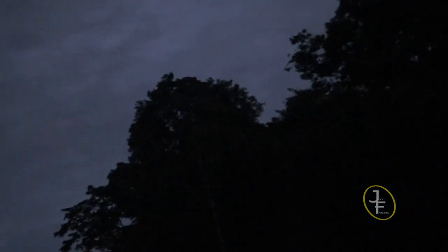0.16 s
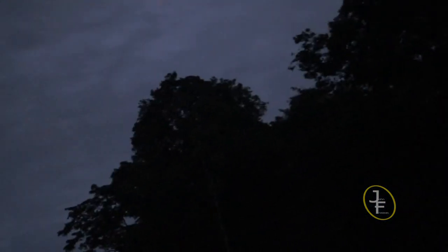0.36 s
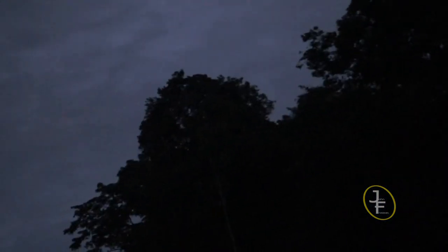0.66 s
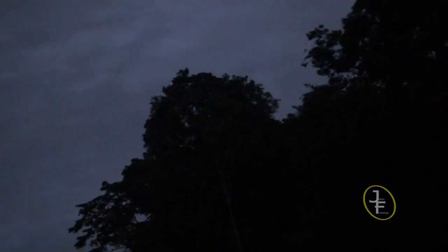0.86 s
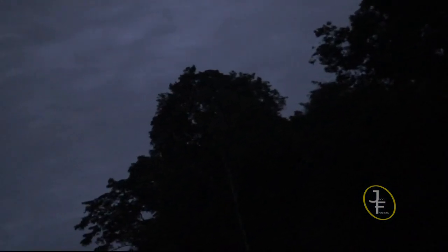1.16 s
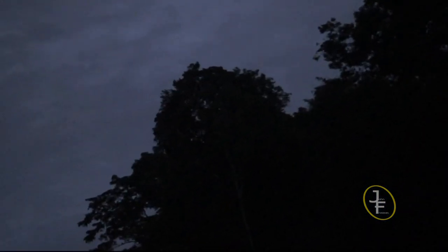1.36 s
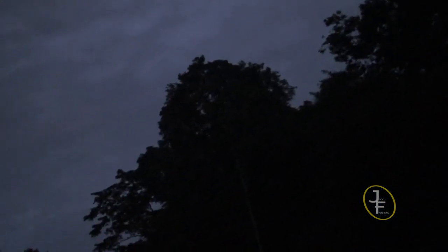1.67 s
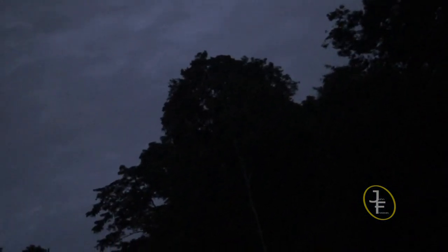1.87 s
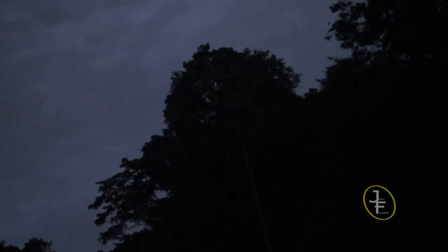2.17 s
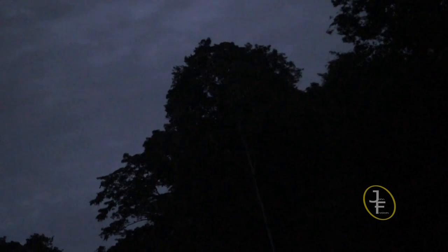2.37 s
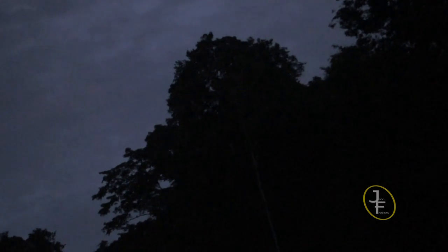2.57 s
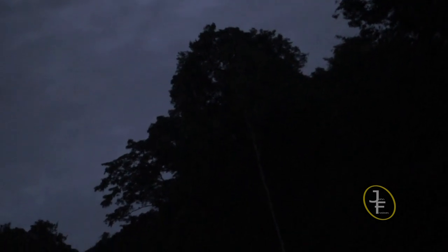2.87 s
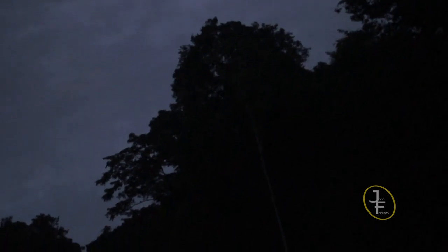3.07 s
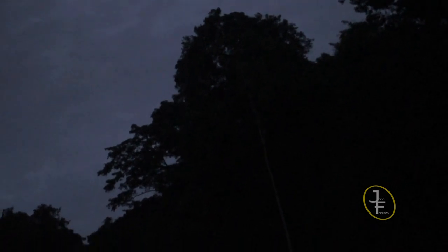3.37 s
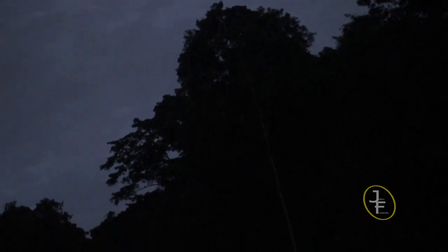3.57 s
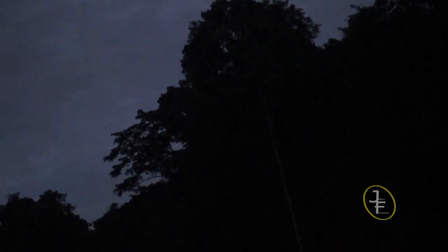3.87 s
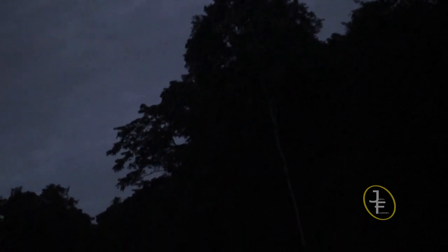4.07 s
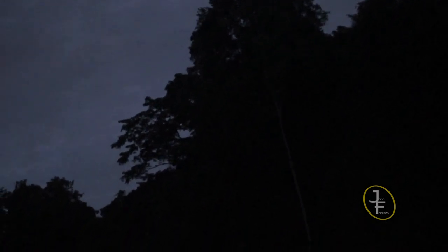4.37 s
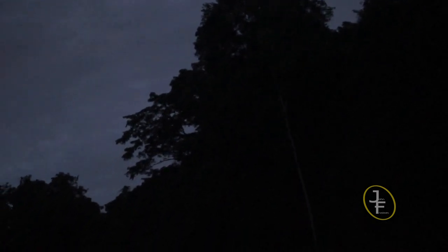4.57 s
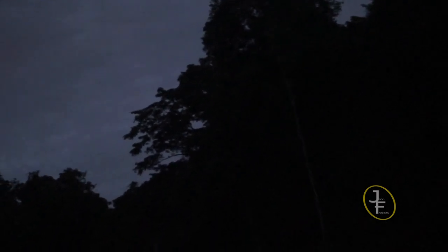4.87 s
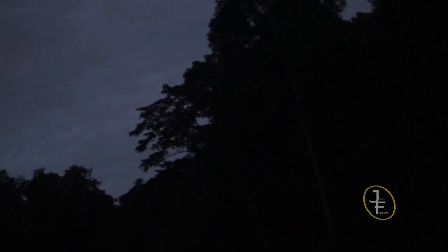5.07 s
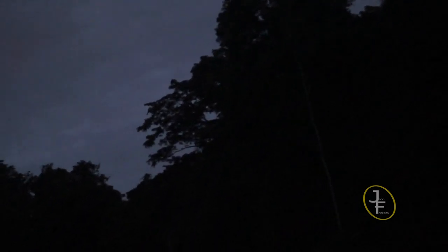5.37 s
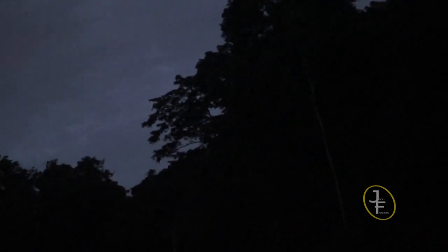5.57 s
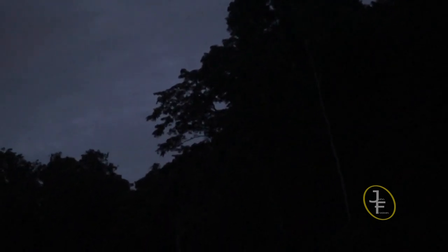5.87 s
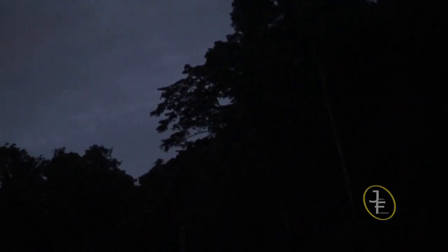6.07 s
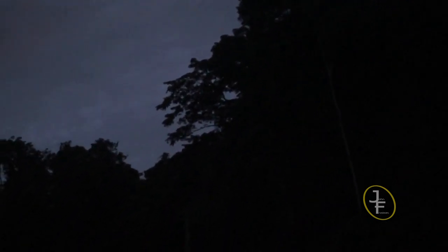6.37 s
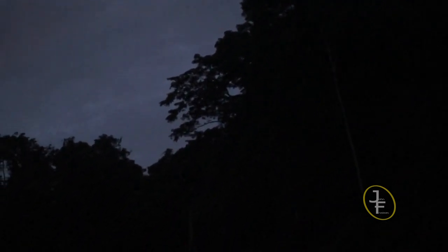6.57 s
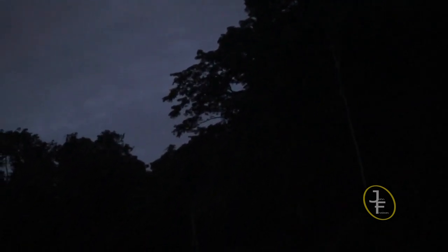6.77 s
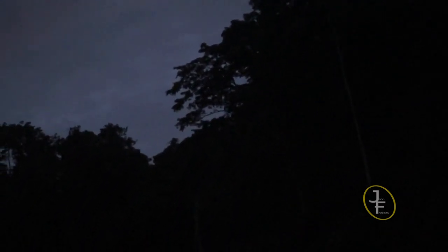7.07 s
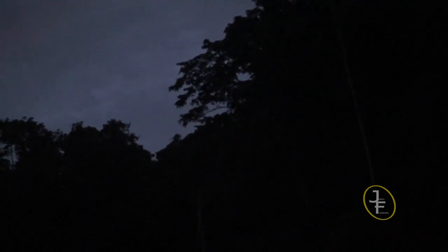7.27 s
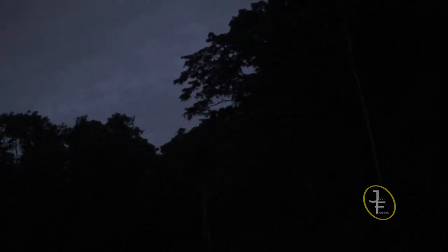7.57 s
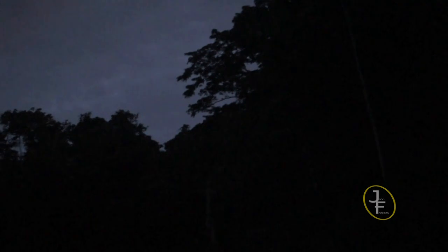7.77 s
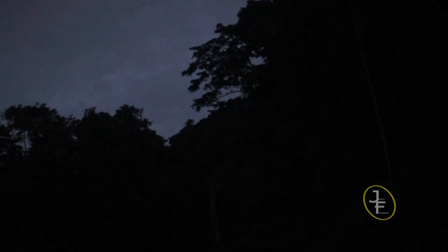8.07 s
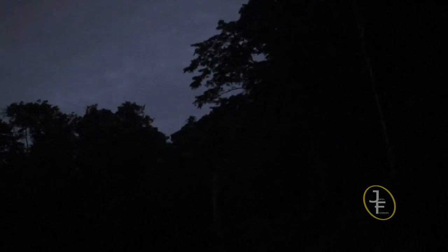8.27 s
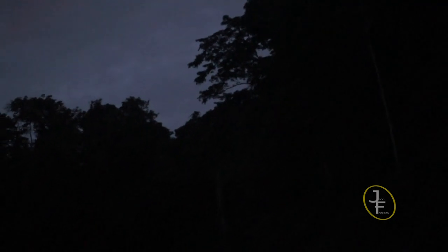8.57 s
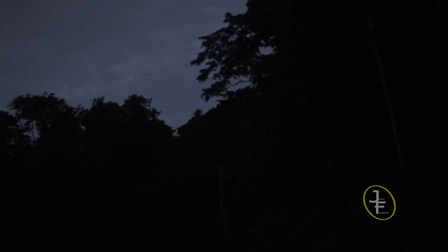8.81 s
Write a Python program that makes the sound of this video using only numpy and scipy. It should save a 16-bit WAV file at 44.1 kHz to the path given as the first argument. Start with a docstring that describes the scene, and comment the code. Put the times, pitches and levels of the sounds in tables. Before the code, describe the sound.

Dusk in a rainforest, wide stereo. From 0 to about 1.6 s a distant howler monkey ends a hoarse, throaty roar, rough and breathy with a wavering tone, fading into soft tree echoes over a low drone and a steady high insect shimmer. Between 1.3 and 2.6 s a katydid gives four coarse rasps; frogs peep and cluck. Low, woofing barks come at 2.3 and 3.4 s, with dark lingering echoes; rising clucks cluster around 3 s. From 3.4 s two near insects enter on the right, one chirping unevenly, a higher one about four times a second, with cricket trills and ticking behind. A faint leaf rustle passes near 4 s. Drops ring leaves at 3.4-3.7 and 5-5.5 s. Soft bumps fall near 5.8 s and the drone vanishes by 6.2 s. Whistled peeps cluster around 6 s; from 6.3 s drips patter densely, thinning towards 9 s as insects continue.

```python
"""A rainforest at dusk, heard in stereo: a distant howler monkey ends a long, hoarse roar and barks twice.
Uneven pulses of its vocal folds ring throat and chest, and the trees echo the calls.
Crickets and katydids scrape their wings all round as pulsed bands of noise, two of them close by.
Frogs cluck through a ringing vocal sac and peep in plain whistles; drops ring leaves and splash.
A low drone, a high hiss, a faint hush, a thin high band of noise, bumps and a brief rustle lie underneath."""
import sys
import numpy as np
from scipy import signal
from scipy.fft import rfft, irfft, next_fast_len
from scipy.io import wavfile

SR = 44100
rng = np.random.default_rng(int(sys.argv[2]) if len(sys.argv) > 2 else 0)


def wav_record(signal):
    """Record a signal, one row per channel, as 16-bit PCM in the file named by sys.argv[1]."""
    frames = np.transpose(np.atleast_2d(signal))
    bounded = np.clip(frames, -1, 1)
    # unit amplitude maps onto the largest positive 16-bit level
    quanta = np.round(bounded * 32767).astype(np.int16)
    wavfile.write(sys.argv[1], SR, quanta)


N = 394254
TIME = np.arange(N) / SR   # s

# course of the roar: time_s, effort_db, mouth_hz (the region the mouth favours)
ROAR = [(0.0, -34, 980), (0.48, -31, 970), (0.53, -29, 970), (0.89, -27.5, 940), (0.96, -31, 790),
        (1.27, -34, 800), (1.38, -37.5, 913), (1.61, -38.5, 870), (1.68, -45, 850), (2.2, -61.5, 882)]
# resonances of the throat, the rasp and the chest: centre_hz, width_hz, level_db
THROAT_MODES = [(470, 108, -7), (610, 123, -7), (745.5, 51, -0.5), (824, 37, -3), (898, 76, -1.5),
                (978, 55, -5), (1077, 71, -1)]
RASP_MODES = [(1233, 92, 3), (1391, 33, 5.5), (1470, 97, -3), (1720, 60, -13), (1820, 61, -9),
              (2100, 190, -17.5)]
CHEST_MODES = [(180, 32, 0), (292, 35, 1), (349, 27, 0.98)]
# overtones of the roar's clear tone: multiple, level_db
TONE_OVERTONES = [(1, -0.5), (2, -3), (3, -14.5), (4, -18), (5, -17)]
# parts of the roar: level_db at the reference effort, share of the effort's swing followed,
# gain_db as the mouth closes
VOICE_LAW = (-28.5, 1.075, 0)
RASP_LAW = (-41.5, 1, 5.5)
EDGE_LAW = (-50, 1, -6)
CHEST_LAW = (-51.5, .45, 1.5)
TONE_LAW = (-37, 0.57, 0)
REFERENCE_EFFORT_DB, OPEN_MOUTH_HZ, CLOSED_MOUTH_HZ = -28.5, 950, 800
TONE_HZ = 460.3

# the far choirs' change of balance: time_s, later_share (0-1)
LATER = [(0, 0.02), (3.2, 0.05), (4.5, 0.13), (6.2, 0.6), (8.94, 0.9)]
# far insect choirs: centre_hz, width_hz, pulses_per_s, first_level_db, later_level_db
CHOIRS = [(3383, 290, 45, -63, -63), (4070, 940, 51, -54.5, -61), (5000, 570, 54, -53, -51.5),
          (5540, 446, 78, -44, -43), (6148, 397, 60, -42.5, -41.5), (6612, 460, 100, -47.5, -45.5),
          (7056, 520, 120, -51.5, -60), (7650, 610, 99, -54, -81)]

# spectra of the low drone, the high hiss and the faint hush: frequency_hz, level_db
DRONE = [(18, -47.5), (30, -20), (143, -7), (236, -4), (321, -2.5), (490, -4.5), (618, -7.5), (1340, -12),
         (3000, -18), (3900, -37), (6600, -120)]
AIR = [(40, -26.5), (300, -22), (800, -7), (1400, 1.5), (2200, 5.5), (3200, 5), (6000, -5.5), (9000, 0),
       (15500, -5)]
HUSH = [(25, -14.5), (150, -3), (400, 0.5), (900, 4), (2000, -4), (6000, -45)]
# courses of the drone, the hiss, the hush and the brief rustle: time_s, level_db
DRONE_DB = [(0, -53.5), (3.3, -50.5), (4.5, -55), (5.5, -61), (6.18, -61.5), (6.23, -102), (8.94, -90)]
AIR_DB = [(0, -54), (3.5, -53.5), (4.1, -49.5), (4.6, -51.5), (6.3, -54.5), (7.4, -54), (8.94, -54)]
HUSH_DB = [(0, -77), (6.17, -61.5), (6.22, -78), (7.85, -77.5), (7.97, -67), (8.94, -68.5)]
LEAVES_DB = [(3.6, -69), (3.95, -64), (4.1, -65), (4.35, -75), (4.7, -80)]
# the hiss above this frequency dims as the later choir takes over
AIR_TOP_HZ, AIR_TOP_FIRST_DB, AIR_TOP_LATER_DB = 8500, 0.5, -2.5

# soft low bumps: start_s, length_s, level_db, pitch_hz (midway)
BUMPS = [(.54, 0.033, -50, 137), (5.724, 0.037, -59, 242), (5.905, 0.046, -50, 124),
         (5.924, 0.036, -52.5, 227)]
# a katydid's rasps: start_s, length_s, level_db
RASPS = [(1.286, 0.24, -49), (1.628, 0.21, -50.5), (2.005, 0.27, -49), (2.37, .19, -48)]
# frog peeps: start_s, peak_db, pitch_hz (midway), left_over_right_db
PEEPS = [(1.782, -43, 4820, -2), (2.03, -43, 4760, -4), (3.34, -39.5, 4680, -12), (4.154, -45, 4940, 14),
         (4.986, -40, 5000, 6), (5.075, -39, 5030, 0), (5.86, -40, 4780, 4), (6.004, -34.5, 4720, -13),
         (6.04, -43, 3340, 7), (6.215, -46.5, 3410, -1), (6.29, -47, 3310, 2), (6.35, -46, 3320, 1),
         (6.465, -48, 3470, -2), (6.71, -44.5, 3420, 0), (7.26, -35.5, 4820, 4.5), (8.374, -41.5, 4890, 10),
         (8.66, -48, 4780, 9)]
PEEP_S = 0.049
# frog clucks: start_s, length_s, level_db, pitch_hz (midway), sac_width_hz
CLUCKS = [(2.036, 0.051, -50, 1597, 250), (2.005, 0.048, -57, 2310, 300), (2.327, .12, -57, 2025, 400),
          (2.668, 0.062, -53.5, 1717, 300), (2.781, .067, -53.5, 1860, 300),
          (3.007, 0.06, -46.5, 1723, 500), (3.131, 0.0636, -44.5, 1912, 600),
          (3.279, .061, -44.5, 1908, 600), (5.011, .038, -47, 1690, 250), (5.139, 0.055, -50, 1706, 300)]
CLUCK_RISE = 0.1   # glide from start to end, as a share of the pitch
# barks: start_s, length_s, level_db, pulses_per_s
BARKS = [(2.282, 0.179, -33.5, 78), (3.445, 0.175, -36.5, 74)]
# resonances of the bark: centre_hz, width_hz, level_db
BARK_MODES = [(152, 56, -5.5), (257, 76, -1), (333.4, 34, 7), (464, 260, -10), (636, 183, -2.5),
              (767, 152, -2.5)]

# chirps of the lower and of the higher near insect: start_s, level_db
LOW_CHIRPS = [(3.64, -37.5), (4.03, -40), (4.21, -42), (4.41, -39), (4.84, -42), (5.19, -44), (5.47, -41.5),
              (5.6, -42), (5.78, -44), (6.02, -40.5), (6.22, -41.5), (6.49, -41), (6.62, -40),
              (6.84, -41.5), (7.14, -39), (7.55, -43), (7.8, -42), (8.03, -39), (8.34, -38), (8.71, -35.5)]
HIGH_CHIRPS = [(3.6, -42), (3.83, -40), (4.06, -41), (4.34, -46), (4.61, -40.5), (4.87, -37.5),
               (5.12, -40.5), (5.39, -41), (5.64, -42.5), (5.88, -38), (6.11, -36), (6.37, -35),
               (6.62, -41), (6.82, -46.5), (7.1, -39.5), (7.36, -37.5), (7.59, -39.5), (7.8, -38),
               (8.0, -43), (8.22, -41.5), (8.48, -43), (8.74, -44)]
LOW_CHIRP_S, LOW_EDGE_S, LOW_BETWEEN_DB = 0.17, 0.047, -48
HIGH_CHIRP_S, HIGH_EDGE_S, HIGH_BETWEEN_DB = 0.186, 0.038, -52
NEAR_FROM_S, NEAR_FADE_S = 3.4, 0.21   # the two near insects fade in: start_s, fade_s

# drips placed one by one: start_s, level_db (of the ring), pitch_hz, left_over_right_db
DRIPS = [(3.401, -29, 3680, -8), (3.524, -29.5, 4400, -4), (3.691, -28.5, 3150, -13),
         (4.986, -25, 4000, -8), (5.316, -31.5, 3900, -10), (5.359, -31, 3640, -10), (5.442, -29, 3760, 7),
         (5.507, -28, 3600, -10), (6.35, -39, 1860, -10), (6.92, -51.5, 795, -1.5),
         (7.087, -36.5, 2520, -10), (7.103, -39, 2150, 10), (7.3, -27, 3960, -11),
         (7.326, -41.5, 1050, -12), (7.363, -29.5, 4060, 6), (7.392, -38, 2390, -7),
         (7.472, -36, 2970, -11), (7.659, -34, 3540, -9), (7.85, -40, 1270, 10), (7.853, -58, 610, -9),
         (7.948, -35, 3340, -8), (7.894, -40, 1640, 5), (7.977, -33.5, 3430, -11), (8.047, -30.5, 2170, 10),
         (8.123, -34, 2450, -13), (8.145, -44, 1160, -2), (8.186, -32.5, 3500, -14),
         (8.213, -28.5, 3600, -9), (8.749, -35, 2880, -14)]
SPLASH_TOP_HZ = 10600
# one cricket's bouts of trilling: start_s, length_s, level_db
TRILLS = [(3.45, .78, -51), (4.1, 0.44, -54), (4.45, 0.71, -50), (5.35, 0.76, -49.5), (6.12, 1.1, -51),
          (7.16, 0.48, -46.5), (7.55, 1.26, -52.5)]
TRILL_EDGE_S = 0.21
# single bouts of two farther crickets and of a high, ticking one: start_s, length_s, level_db
THIN_TRILL = (5.55, 3.8, -52.5)
FAR_TRILL = (3.85, 1.46, -58)
TICKING = (3.5, 2.14, -53)
TICKS_PER_S, TICK_AT_S = 4, 3.5
# a thin, very high band of noise: start_s, length_s, level_db (before its swells)
HIGH_BAND = (4.7, 4.6, -65.5)
CUTOFF_HZ = 15750


def from_db(db):
    """Decibels to gain."""
    return 10 ** (np.asarray(db) / 20)


def rms_one(x):
    """Scale to unit rms."""
    return x / np.sqrt(np.mean(x ** 2) + 1e-20)


def in_time(rows):
    """The columns of a curve, sample by sample."""
    s, *columns = np.transpose(rows)
    return [np.interp(TIME, s, c) for c in columns]


def during(rows):
    """One while a curve lasts, fading over 0.1 s outside it."""
    inside_s = np.minimum(TIME - rows[0][0], rows[-1][0] - TIME)
    return np.clip(1 + inside_s * 10, 0, 1)


def drift(rate):
    """Smooth chance of unit rms, with this many random knots a second."""
    knots = rng.standard_normal(4096)
    return rms_one(np.interp(TIME * rate, np.arange(len(knots)), knots, period=len(knots)))


def band(x, hz, width_hz, order=2):
    """Band-pass round a centre."""
    edges = np.clip([hz - width_hz / 2, hz + width_hz / 2], 15, SR / 2 - 100)
    return signal.sosfilt(signal.butter(order, edges, "band", fs=SR, output="sos"), x + 1e-18)


def resonate(x, modes):
    """Parallel resonances with alternating signs."""
    return sum((-1) ** k * from_db(db) * band(x, hz, width, order=1)
               for k, (hz, width, db) in enumerate(modes))


def cut(x, hz, kind, order=4):
    """Low-pass or high-pass."""
    return signal.sosfilt(signal.butter(order, hz, kind, fs=SR, output="sos"), x)


def coloured(x, spectrum):
    """Give noise a spectrum; rms 1."""
    hz, db = np.transpose(spectrum)
    size = next_fast_len(N)
    bins = np.maximum(np.fft.rfftfreq(size, 1 / SR), 1)
    gain = from_db(np.interp(np.log(bins), np.log(hz), db))
    return rms_one(irfft(rfft(x, size) * gain, size)[..., :N])


def wide_noise(alike):
    """Stereo noise with a given left-right correlation."""
    mid, side = rng.standard_normal((2, N))
    alike = np.clip(alike, 0, 1)
    return np.sqrt(1 + alike) * mid + np.sqrt(1 - alike) * side * [[1], [-1]]


def pan(db):
    """Left and right gains for a level difference; positive leans left."""
    return from_db(np.array([[db], [-db]]) / 2)


def burst(s, length, edge):
    """A call's envelope with rounded edges."""
    inside_s = np.minimum(TIME - s, s + length - TIME)
    return np.sin(np.pi / 2 * np.clip(inside_s / edge, 0, 1))


def bouts(rows, edge):
    """Envelope of a row of sounds, each with its start, length and level."""
    return sum(from_db(db) * burst(s, length, edge) for s, length, db in rows)


def forest(x, t60, wet_db, spread_db=0):
    """Direct sound plus a dying cloud of echoes from trunks and leaves; far sources spread little to the sides."""
    t = TIME[:3 * SR]
    decay = from_db(-60 * t / t60) * np.minimum(t * 50, 1)   # builds up over 20 ms
    mid, side = rng.standard_normal((2, len(t))) * decay
    echoes = mid + from_db(spread_db) * side * [[1], [-1]]
    echoes /= np.sqrt(np.sum(echoes ** 2, axis=1, keepdims=True))
    return x + from_db(wet_db) * signal.fftconvolve(np.atleast_2d(x), echoes, axes=1)[:, :N]


def hoarse_folds(rate, jitter, air):
    """Vocal folds slap shut at uneven times, each slap with a puff of turbulence."""
    cycles = np.cumsum(rate * np.exp(jitter * drift(150))) / SR
    slaps = np.diff(np.floor(cycles), prepend=0)
    puffs = np.exp(-2 * (cycles % 1)) * rng.standard_normal(N)
    return rms_one(slaps) + air * rms_one(puffs)


def roar():
    """Uneven folds ring throat and chest; the mouth favours one region, a wavering tone rides on top, effort drives all."""
    effort_db, mouth_hz = in_time(ROAR)
    closing = np.clip((OPEN_MOUTH_HZ - mouth_hz) / (OPEN_MOUTH_HZ - CLOSED_MOUTH_HZ), 0, 1)
    folds = hoarse_folds(rate=150, jitter=0.22, air=0.98)
    mouth_width_hz, mouth_db = 150, 6
    voice = 0
    for hz, width, db in THROAT_MODES:
        lift_db = mouth_db * np.exp(-((hz - mouth_hz) / mouth_width_hz) ** 2)
        voice = voice + from_db(db + lift_db) * band(folds, hz, width)
    rasp = cut(cut(resonate(folds, RASP_MODES), 2400, "low", order=6), 960, "high")
    edge = cut(band(folds, 2386, 220, order=1), 2450, "low", order=10)
    chest = cut(resonate(folds, CHEST_MODES), 480, "low")
    waver = 1 + 0.006 * drift(8) + 0.02964 * drift(120)
    phase = 2 * np.pi * np.cumsum(TONE_HZ * waver) / SR
    tone = sum(from_db(db) * np.sin(multiple * phase) for multiple, db in TONE_OVERTONES)
    tone = tone * from_db(3.5 * drift(34.6))
    parts = [(voice, VOICE_LAW), (rasp, RASP_LAW), (edge, EDGE_LAW), (chest, CHEST_LAW), (tone, TONE_LAW)]
    call = 0
    for part, (db, follows, closed_db) in parts:
        part_db = db + follows * (effort_db - REFERENCE_EFFORT_DB) + closed_db * closing
        call = call + rms_one(part) * from_db(part_db)
    return forest(call * during(ROAR), t60=0.88, wet_db=-8, spread_db=-53.5)


def wing_strokes(rate, wander, sharpness):
    """Envelope of a file drawn over a scraper again and again."""
    cycles = np.cumsum(rate * (1 + wander * drift(8))) / SR
    return np.exp(sharpness * np.cos(2 * np.pi * cycles))


def choirs():
    """Many far insects of each kind blur into a faintly pulsing band of noise."""
    later, = in_time(LATER)
    out = 0
    for hz, width, rate, first_db, later_db in CHOIRS:
        strokes = wing_strokes(rate, wander=0.059, sharpness=0.12)
        song = band(wide_noise(alike=0.53) * strokes, hz, width, order=3)
        level_db = first_db + later * (later_db - first_db) + 1.6 * drift(14)
        out = out + rms_one(song) * from_db(level_db)
    return out * pan(-0.7)


def background():
    """Coloured noises: a low drone that drops away, a hiss that dulls, a faint hush and one rustle of leaves."""
    later, = in_time(LATER)
    drone = coloured(rng.standard_normal(N), DRONE) * from_db(in_time(DRONE_DB)[0] + 0.98 * drift(10))
    air = coloured(wide_noise(alike=0.17), AIR) * from_db(in_time(AIR_DB)[0]) * pan(-1)
    top_gain = from_db(AIR_TOP_FIRST_DB + later * (AIR_TOP_LATER_DB - AIR_TOP_FIRST_DB))
    air = cut(air, AIR_TOP_HZ, "low", order=3) + top_gain * cut(air, AIR_TOP_HZ, "high", order=3)
    hush = coloured(wide_noise(alike=0.23), HUSH) * from_db(in_time(HUSH_DB)[0])
    flutter = from_db(5.9 * drift(430))
    leaves = rms_one(band(wide_noise(alike=1.0) * flutter, 10000, 4000))
    leaves = leaves * from_db(in_time(LEAVES_DB)[0])
    return drone + air + hush + leaves


def bumps():
    """Soft low bumps: swelling and fading sines that sag in pitch."""
    sag = 0.36   # fall from start to end, as a share of the pitch
    out = 0
    for s, length, db, hz in BUMPS:
        t = TIME - s
        phase = 2 * np.pi * hz * t * (1 + sag * (1 - t / length) / 2)
        out = out + from_db(db) * burst(s, length, edge=length / 2) * np.sqrt(2) * np.sin(phase)
    return out


def katydid():
    """A few short rasps of a coarse file."""
    strokes = wing_strokes(85, wander=0.065, sharpness=0.25)
    rasp = rms_one(band(wide_noise(alike=0.6) * strokes, 4610, 560)) * pan(-2.5)
    return rasp * bouts(RASPS, edge=0.035)


def peeps():
    """Small frogs whistle short, slightly rising notes."""
    out, waver = 0, 1 + 0.00603 * drift(150)
    for s, db, hz, side_db in PEEPS:
        rise = 1 + 0.012 * np.clip((TIME - s) / PEEP_S - 0.5, -1, 1)
        whistle = np.sin(2 * np.pi * np.cumsum(hz * waver * rise) / SR)
        out = out + pan(side_db) * (from_db(db) * burst(s, PEEP_S, edge=0.037) * whistle)
    return forest(out, t60=0.63, wet_db=2.5)


def clucks(sac_pulses_hz=165):
    """Frogs give brief rising rattles whose overtones ring in the vocal sac."""
    out, waver = np.zeros(N), 1 + 0.012 * drift(200)
    offsets_hz = np.arange(-3, 4) * sac_pulses_hz
    for s, length, db, hz, width in CLUCKS:
        on = slice(int(s * SR), int((s + length) * SR))
        glide = waver[on] * (1 + CLUCK_RISE * ((TIME[on] - s) / length - 0.5))
        clock = 2 * np.pi * np.cumsum(glide) / SR
        note = 0
        for d in offsets_hz:
            overtone = np.sin((hz + d) * clock + rng.uniform(0, 2 * np.pi))
            note = note + overtone / (1 + (2 * d / width) ** 2)
        out[on] += from_db(db) * rms_one(note) * burst(s, length, edge=0.019)[on]
    return forest(out, t60=1.0, wet_db=0.0, spread_db=-33)


def barks():
    """Short low woofs, blurred by the leaves; the ringing throat tones carry farthest through the trees."""
    out = 0
    for s, length, db, rate in BARKS:
        voice = resonate(hoarse_folds(rate, jitter=0.3, air=1.55), BARK_MODES)
        voice = cut(cut(voice, 1090, "low", order=6), 133, "high", order=2)
        out = out + from_db(db) * rms_one(voice) * burst(s, length, edge=0.05)
    carried = from_db(-5) * band(out, 326.0, 49) + from_db(0.5) * band(out, 646, 102)
    carried = carried + from_db(-2.5) * cut(out, 185, "high", order=2)
    echoes = forest(carried, t60=2.46, wet_db=-1.5, spread_db=-53.5) - carried
    return out + echoes


def insect(envelope, hz, width_hz, rate, sharpness, overtone_db, side_db, alike, whine=0):
    """One singer: each stroke scrapes its wing membrane into ringing, with an optional narrow whine and a faint octave."""
    strokes = wing_strokes(rate, wander=0.0235, sharpness=sharpness)
    scrape = rms_one(band(wide_noise(alike), hz, width_hz, order=3))
    pure = rms_one(band(wide_noise(alike), hz, width_hz / 5))
    song = rms_one((scrape + whine * pure) * strokes)
    # squaring doubles the pitch
    song = song + from_db(overtone_db) * rms_one(cut(song ** 2, hz * 2.1, "high"))
    return song * envelope * pan(side_db)


def chirping(chirps, length, edge, between_db):
    """Envelope of a singer whose chirps are alike in shape, with a soft buzz between them."""
    return np.maximum(bouts([(s, length, db) for s, db in chirps], edge), from_db(between_db))


def buzzers():
    """Two near insects on the right: the lower chirps unevenly, the higher about four times a second."""
    depth = 0.55
    uneven = chirping(LOW_CHIRPS, LOW_CHIRP_S, LOW_EDGE_S, LOW_BETWEEN_DB)
    steady = chirping(HIGH_CHIRPS, HIGH_CHIRP_S, HIGH_EDGE_S, HIGH_BETWEEN_DB)
    low = insect(uneven, 5550, 350, 58.5, depth, overtone_db=-27.5, side_db=-6.5, alike=0.2, whine=0.7)
    high = insect(steady, 6365, 280, 67, depth, overtone_db=-38, side_db=-2.5, alike=0.63, whine=0.72)
    return (low + high) * np.clip((TIME - NEAR_FROM_S) / NEAR_FADE_S, 0, 1)


def drips(splash_at_4khz_db=-7, patter_floor_db=-51):
    """A drop rings a leaf at three pitches and throws a bright splash; smaller drops patter at random from 6.3 s."""
    ring_cycles = 36   # cycles for the ring to fall by 60 dB
    out, t = np.zeros((2, N)), TIME[:SR // 10]
    patter = [(6.3 + 2.5 * u, patter_floor_db + 7 * v, 1400 + 2800 * w, 12 * p - 8)
              for u, v, w, p in rng.random((35, 4))]
    for s, db, hz, side_db in list(DRIPS) + patter:
        modes = [(hz, 0), (hz * rng.uniform(0.598, 0.96), -12), (hz * rng.uniform(1.05, 1.5), -10)]
        ring = sum(np.sin(2 * np.pi * f * t) * from_db(mode_db - 60 * t * f / ring_cycles)
                   for f, mode_db in modes)
        ring = ring * (1 - np.exp(-t * hz / 2))   # a wet contact is soft
        splash = cut(rng.standard_normal(len(t)) * np.exp(-t / 0.002), 2000, "high", order=2)
        splash = cut(splash, SPLASH_TOP_HZ, "low")
        splash = from_db(splash_at_4khz_db) * splash * (hz / 4000) ** 0.72
        drop = from_db(db) * (ring + splash) * pan(side_db)
        at = int(s * SR)
        out[:, at:at + len(t)] += drop[:, :N - at]
    return forest(out, t60=0.066, wet_db=-5.0)


def crickets():
    """Farther off, three crickets trill with fast wing strokes and a high one ticks."""
    trill = insect(bouts(TRILLS, TRILL_EDGE_S), 4512, 255, rate=71, sharpness=0.15,
                   overtone_db=-42.0, side_db=-1.5, alike=0.83)
    thin = insect(bouts([THIN_TRILL], edge=0.4), 4665, 60, rate=91, sharpness=0.24,
                  overtone_db=-57, side_db=1.5, alike=0.51)
    far = insect(bouts([FAR_TRILL], edge=0.27), 3500, 150, rate=110, sharpness=0.35,
                 overtone_db=-50, side_db=1, alike=0.37)
    ticks = np.maximum(np.cos(2 * np.pi * TICKS_PER_S * (TIME - TICK_AT_S)), 0) ** 2
    ticking = insect(bouts([TICKING], edge=0.32) * ticks, 7350, 200, rate=140, sharpness=0.4,
                     overtone_db=-50, side_db=2, alike=0.55)
    return trill + thin + far + ticking


def high_band():
    """A thin, very high band of noise near 11.2 kHz that swells and fades irregularly."""
    noise = rms_one(band(wide_noise(alike=0.48), 11220, 380))
    swells = from_db(3.3 * np.tanh(drift(8.4)) - 2)
    return noise * bouts([HIGH_BAND], edge=0.44) * swells * pan(-2)


def scene():
    """Monkey, clucks, bumps and drone straight ahead; insects, peeps, drips and hiss spread to the sides."""
    insects = choirs() + katydid() + buzzers() + crickets()
    frogs = peeps() + clucks()
    return roar() + barks() + insects + high_band() + frogs + drips() + bumps() + background()


def record(dry):
    """The microphone's top is cut steeply."""
    return signal.sosfilt(signal.ellip(12, 0.1, 80, CUTOFF_HZ, fs=SR, output="sos"), dry)


dry = scene()
out = record(dry)
wav_record(out)
```